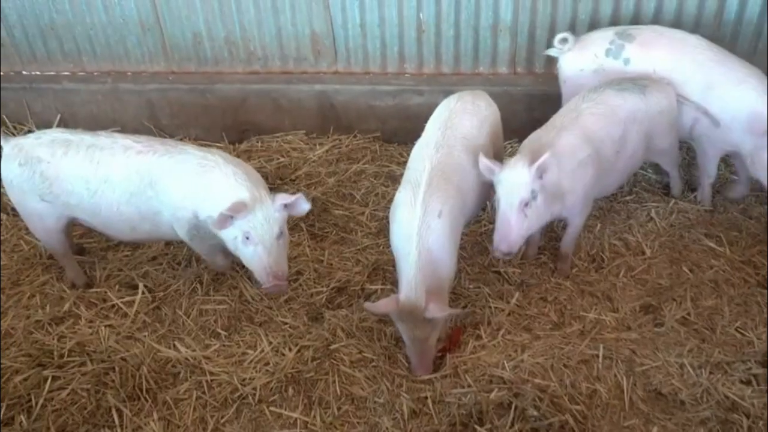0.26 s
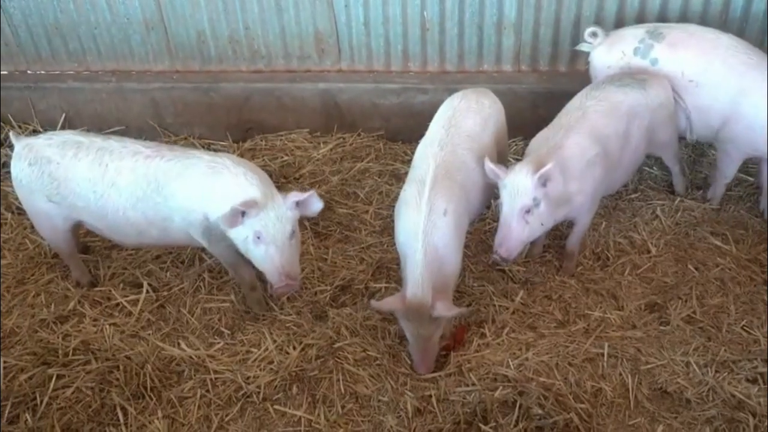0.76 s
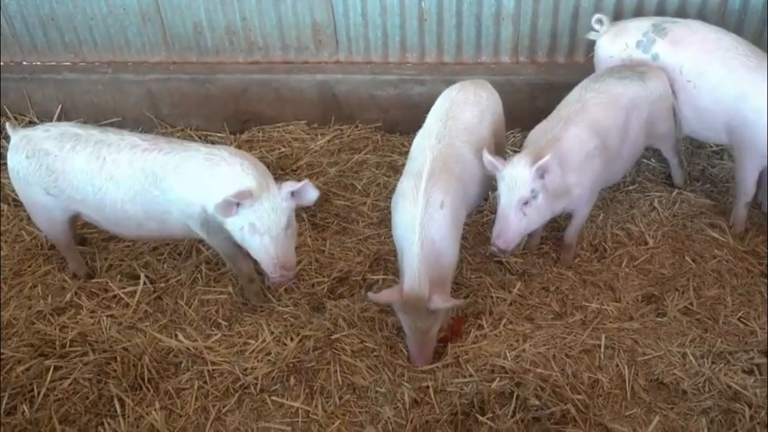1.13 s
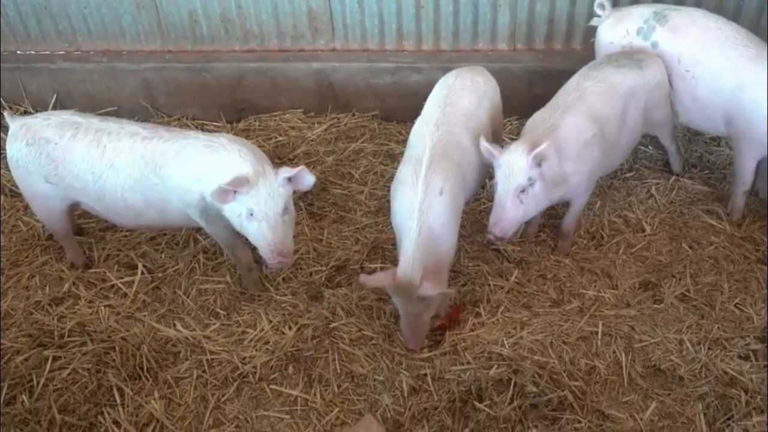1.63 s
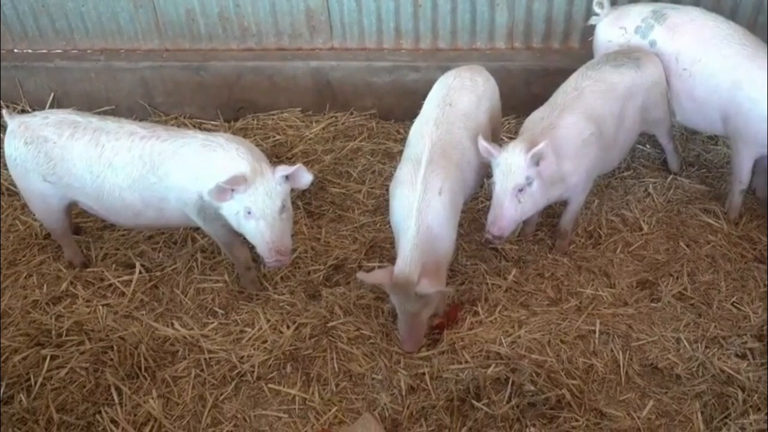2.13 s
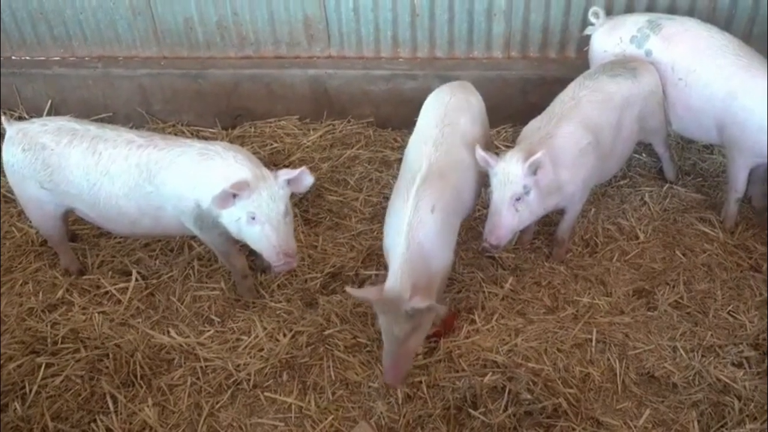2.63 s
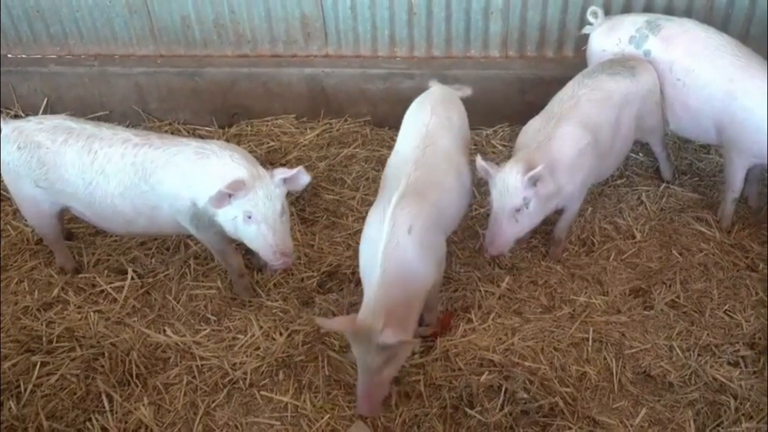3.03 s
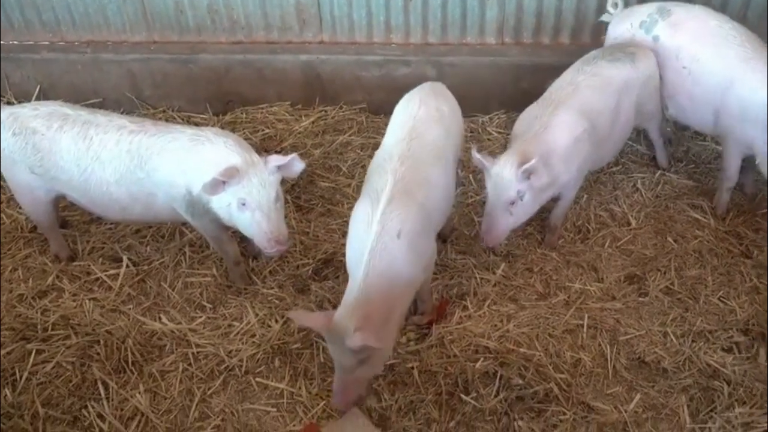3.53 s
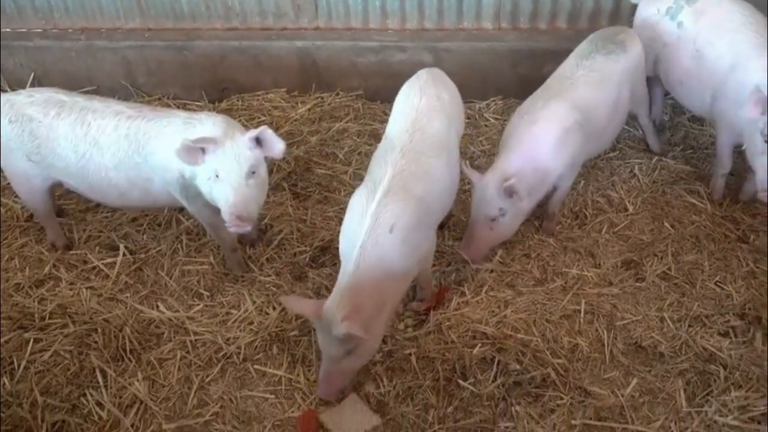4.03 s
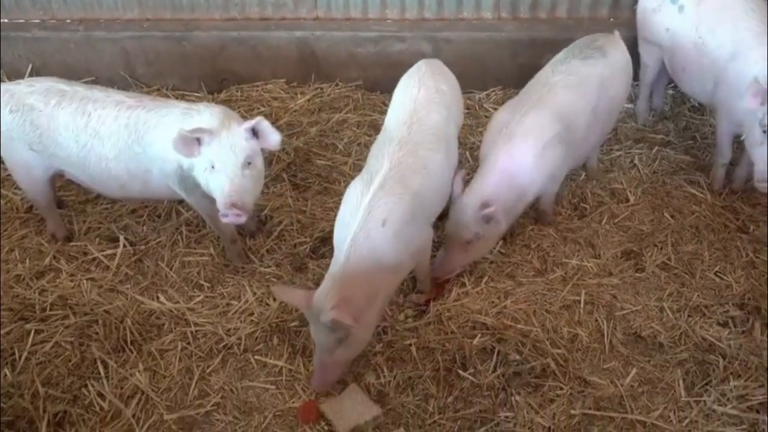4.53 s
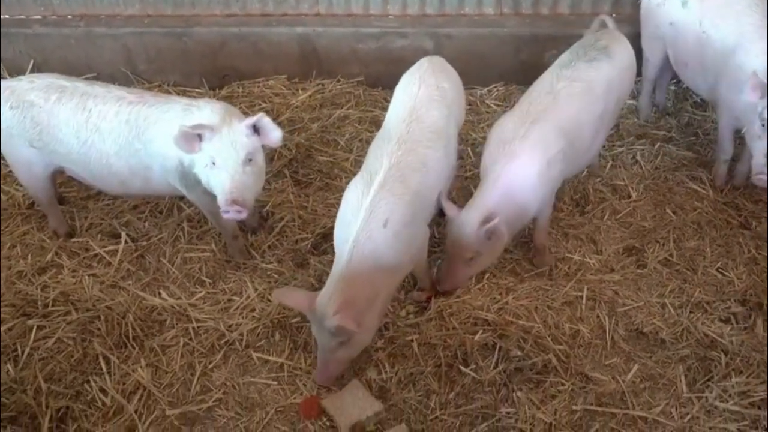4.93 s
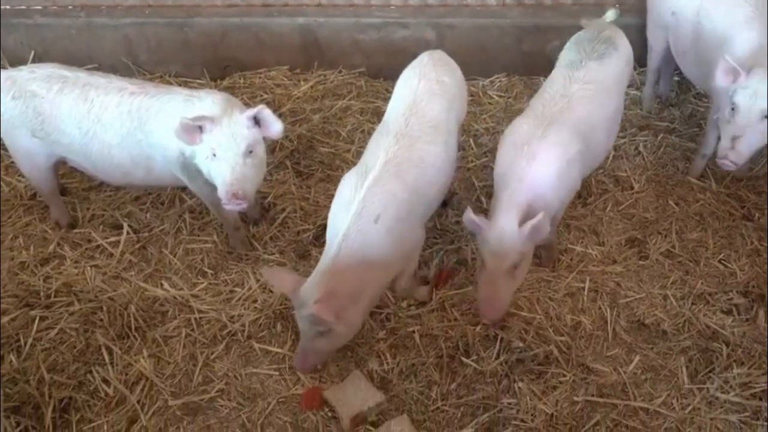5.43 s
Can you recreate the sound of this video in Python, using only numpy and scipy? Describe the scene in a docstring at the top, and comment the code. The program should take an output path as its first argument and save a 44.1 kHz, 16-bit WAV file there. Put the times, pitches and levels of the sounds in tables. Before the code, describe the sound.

About a third of a second of silence, then soft shed noise and faint straw crackles open abruptly. Young pigs close to a dull microphone give nine short, fluttering low grunts, separated by airy snuffles and wet smacks. The middle ones are weaker and breathier, with a hoarse nasal whistle and soft hum; the last are the loudest, slightly distorted. Short reflections come from walls and roof.

```python
"""In a low-walled straw pen, after a moment of silence, a dull microphone opens close to young pigs rooting.
Over the shed's soft noise and faint straw crackles come grunts: slow, uneven rattles of throat flaps, about
50 a second, ringing in chest, throat and long snout, with short reflections from the walls and roof.
Between grunts air rushes through the snouts and lips smack; later nostrils whistle hoarsely and a throat hums.
The loudest flaps overload the microphone slightly."""
import sys
import numpy as np
from scipy import signal
from scipy.fft import rfft, irfft
from scipy.io import wavfile
from scipy.ndimage import uniform_filter1d, minimum_filter1d

SR = 44100
rng = np.random.default_rng(int(sys.argv[2]) if len(sys.argv) > 2 else 0)


def persist_wave(psi):
    """Save psi, clipped to +-1, as 16-bit WAV."""
    counts = np.round(np.clip(psi, -1, 1) * 32767).astype(np.int16)
    wavfile.write(sys.argv[1], SR, np.atleast_2d(counts).T)


N = 250929
RASP_FROM_HZ = 1200  # resonances from here up carry the rasp of a grunt and the hiss of a snuffle
TISSUE_WIDTH_HZ = 60  # soft tissue damps every resonance to at least this width


def amp(db):
    """Decibels to gain."""
    return 10 ** (np.asarray(db) / 20)


def evened(x):
    """Scales to rms 1."""
    return x / np.sqrt(np.mean(x ** 2) + 1e-20)


def read(points, hz):
    """Reads a table on a log-frequency axis."""
    f, value = np.transpose(points)
    return np.interp(np.log(hz + 1), np.log(f + 1), value)


def add(mix, s, sound):
    """Mixes a sound in at time s."""
    part = mix[max(round(s * SR), 0):][:len(sound)]
    part += sound[:len(part)]


def lowpass(x, hz):
    """Steep low-pass."""
    taps = signal.firwin(301, hz, window=("kaiser", 8), fs=SR)
    return signal.oaconvolve(x, taps, "same")


def ring(x, modes, size=4096):
    """Passes x through a set of steep resonances, as a causal minimum-phase filter."""
    hz = abs(np.fft.fftfreq(size, 1 / SR))
    power = 0
    for f, width, db in modes:
        offset = 2.16 * (hz - f) / max(width, TISSUE_WIDTH_HZ)
        power = power + amp(db) ** 2 / (1 + offset ** 2) ** 2
    log_gain = np.log(power + 1e-10) / 2
    taps = np.fft.ifft(np.exp(np.conj(signal.hilbert(log_gain)))).real
    return signal.oaconvolve(x, taps)[:len(x)]


def resonate(x, hz, width):
    """A steep resonance that follows the curve hz: shift it to zero, smooth twice, shift back."""
    turn = np.exp(2j * np.pi * np.cumsum(hz * np.ones(len(x))) / SR)
    r = np.exp(-np.pi * width / SR)
    smooth = signal.lfilter([(1 - r) ** 2], [1, -2 * r, r * r], x / turn)
    return 2 * (turn * smooth).real


def puffs(clicks, decay_s, rise_s=0.00027):
    """A burst of turbulent air swells and fades after every click, about as strong whatever its decay."""
    fall, rise = np.exp(-1 / (decay_s * SR)), np.exp(-1 / (rise_s * SR))
    opening = signal.lfilter([np.sqrt(1 - fall ** 2)], [1, -fall], clicks)
    return signal.lfilter([1 - rise], [1, -rise], opening) * rng.standard_normal(len(clicks))


def swell(length, peak_share, depth_db):
    """Level in dB that climbs to 0 at a share of the length and falls back."""
    peak = np.clip(peak_share, .01, .99)
    return np.interp(np.linspace(0, 1, int(length * SR)), [0, peak, 1], [-depth_db, 0, -depth_db])


def arch(first, middle, last, u):
    """A smooth bend through three values as u runs from 0 to 1."""
    bend = middle - (first + last) / 2
    return first + (last - first) * u + bend * 4 * u * (1 - u)


# spectral shape of the shed's noise: (f/Hz, relative level per Hz/dB)
PEN_AIR = [(15, -36), (25, -9), (97, -6), (146, -17.5), (218, -9.5), (341, -15), (763, -12), (831, -25.5),
           (1240, -11), (1440, -19.5), (4000, -20.5), (5200, -51), (8800, -120)]
PEN_AIR_DB = -49


def background(straw_db=-60, crackles_per_s=45):
    """Soft noise of the shed, and faint crackles of trodden straw: short noise bursts at random moments."""
    air = irfft(rfft(rng.standard_normal(N)) * amp(read(PEN_AIR, np.fft.rfftfreq(N, 1 / SR))), N)
    sizes = amp(2.1 * np.minimum(rng.exponential(1, N), 4))
    snaps = (rng.random(N) < crackles_per_s / SR) * sizes
    straw = ring(puffs(snaps, decay_s=0.0035), [(1900, 1200, 0), (3500, 4800, 0)])
    return amp(PEN_AIR_DB) * evened(air) + amp(straw_db) * evened(straw)


# single flaps that crack out above the rattle: (t/s, extra level/dB)
HARD_FLAPS = [(.498, 0.5), (1.066, 0.5), (1.681, 7.5), (1.727, 6.5), (1.752, 5.5), (2.458, 9), (4.291, 4.5),
              (4.808, 4), (5.427, 1.5)]


def flaps(t, rate, end, jitter_s=.0004, uneven_db=1.9):
    """Times and extra dB of the moments when the throat tissue slaps shut, a little uneven in both."""
    turns = np.cumsum(rate) / SR
    due = np.interp(np.arange(np.interp(end, t, turns)), turns, t)
    late, size = rng.standard_normal((2, 40))[:, :len(due)]
    hard_db = sum(db * (abs(due - s) < .009) for s, db in HARD_FLAPS)
    return zip(due + jitter_s * late, uneven_db * size + hard_db)


def wobbled(modes, detune=0.01, uneven_db=2.5):
    """Tongue and snout never hold still: each flap meets slightly different resonances."""
    shifts = rng.standard_normal((len(modes), 2))
    return [(f * (1 + detune * a), width, db + uneven_db * b)
            for (f, width, db), (a, b) in zip(modes, shifts)]


def spread(clicks, hz=900, pole=0.959):
    """An all-pass smears each slap over a millisecond or two, as early reflections off the floor would, so it
    builds up gently."""
    poles = [1, -2 * pole * np.cos(2 * np.pi * hz / SR), pole * pole]
    return signal.lfilter(poles[::-1], poles, clicks)


ONSET_DB, ENDING_DB = -15, -15  # effort at the first and last moment of a grunt, re its hold


def slackening(t, length, attack_s, release_s):
    """Attack, hold and release of a grunt's effort, in dB re the hold."""
    rising = 1 - t / attack_s if t < attack_s else 0
    falling = max(1 - (length - t) / release_s, 0)
    return ONSET_DB * rising + ENDING_DB * falling


SNOUT_SAG = 0.094  # share by which the snout resonance dips in mid-grunt
RASP_KEEPS = .25  # share of lost effort that the rasp does not follow: weak flaps are raspier
# resonances held during each grunt, from throat and nose and from a close reflection off floor or wall; # each
# flap wobbles around them: (f/Hz, width/Hz, relative level/dB)
THROAT_1 = [(147, 204, -10), (379, 81, -6.5), (565, 106, -4.5), (686, 43, -7.5), (784, 95, -1),
            (1770, 280, -26), (2280, 340, -20), (2900, 370, -23.5), (3400, 50, -34), (3510, 270, -21)]
THROAT_2 = [(174, 104, -10.5), (378, 94, -10), (594, 340, -15), (796, 104, -7), (1810, 410, -29),
            (2210, 110, -21.5), (2534, 270, -18), (2940, 440, -24), (3560, 740, -28.5)]
THROAT_3 = [(169.4, 110, 1), (393, 100, 0.5), (578, 140, -2.5), (803, 106, 4), (1827, 180, -21.5),
            (2210, 140, -16), (2486, 155, -13.5), (2880, 220, -22.5), (3450, 960, -25.5)]
THROAT_4 = [(162, 130, -5.5), (392, 340, -12.5), (547, 97, -4), (767, 106, -2), (1845, 170, -20),
            (2140, 150, -22), (2430, 320, -16.5), (2805, 190, -15), (3610, 540, -21.5)]
THROAT_4_END = [(176, 90, -6.5), (386, 140, -11.5), (562, 160, -7.5), (753, 115, -7.5), (830, 54, -4.5),
                (1664, 650, -17), (2250, 170, -35), (2560, 590, -25.5), (2920, 50, -22.5),
                (3380, 1100, -31)]
THROAT_5 = [(149, 58, -1), (214, 43, -5), (351, 280, -4), (616, 200, 1), (785, 29, 1.5), (1710, 16, -23),
            (2030, 449, -23.5), (2560, 182, -23.5), (2820, 160, -23), (3480, 540, -29)]
THROAT_6 = [(162, 135, -6), (305, 37, -2), (393, 99, -4), (554, 162, -15), (766, 39, -4), (1694, 250, 6),
            (2040, 43, -8), (2130, 150, -2), (2550, 250, -7), (3160, 760, -9.5)]
THROAT_7 = [(183, 104, -5), (530, 36, -17.5), (746, 720, -6.5), (806, 20, -17), (876, 34, 1.5),
            (1700, 570, -20.5), (2630, 150, -26), (2770, 61, -25.5), (3150, 89, -27), (3490, 290, -24)]
THROAT_8 = [(214, 180, -10.5), (360, 55, -6), (659, 194, -1.5), (780, 53, -1), (1514, 1100, -29),
            (2590, 1250, -20), (2890, 71, -20.5), (3000, 300, -23.5), (3570, 300, -22)]
THROAT_8_END = [(229, 90, -1.5), (625, 610, -6.5), (720, 104, 4.5), (870, 180, 1), (1607, 95, -7.5),
                (1855, 170, -10), (2162, 95, -6.5), (2860, 96, -30), (3110, 1100, -23.5)]
THROAT_9 = [(183, 45, -2), (405, 670, -8), (635, 146, -2), (760, 160, 3), (813, 65, 4.5),
            (1550, 1600, -21.5), (2097, 50, -12), (2294, 190, -15), (3190, 1100, -28), (3580, 570, -24.5)]
# One row a grunt, two where the mouth changes shape midway.
# Snout and rasp each peak at some share of the length and fall away on both sides.
# (t/s, length/s, first, middle and last flap rate f/Hz, effort level/dB, attack/s, release/s,
#  snout start f/Hz, snout end f/Hz, snout width/Hz, snout level/dB, snout peak share 0-1, snout fall/dB per s,
#  rasp level/dB, rasp peak share 0-1, rasp fall/dB per s, airiness as gain, chest level/dB, throat table)
GRUNTS = [ (0.372, .2, 61.3, 62.85, 37.3, -20.5, 0.033, 0.026, 1055, 1280, 192, -4.5, 0.99, 37, -10.5, 0.52, 75, 0.74, -19, THROAT_1),
          (0.919, .192, 32.73, 52.98, 49.5, -20, 0.059, 0.035, 1320, 1295, 98, 3, 0.74, 88, -9, 0.61, 35.5, 0.67, -10.5, THROAT_2),
          (1.51, 0.31, 38.2, 48.65, 14.9, -18.5, 0.026, 0.24, 1065, 1557, 150, 0, 0.63, 59, -8, 0.49, 38.5, 0.51, -11, THROAT_3),
          (2.254, 0.15, 43.7, 61.9, 37.8, -22.5, 0.025, .005, 1285, 1282, 60, -1, 0.32, 30, -7.5, 0.52, 33, 0.76, -15, THROAT_4),
          (2.4, 0.27, 54.77, 41.23, 40.3, -15.5, 0, 0.35, 1310, 1530, 122, -8.5, 0.05, 96, -13, 0.67, 27, 0.72, -17.5, THROAT_4_END),
          (3.041, .245, 32.88, 43.05, 30, -27, 0.046, 0.093, 1060, 1024, 130, -4.5, 0.63, 94, -15, 0.64, 42, 1.9, -13.5, THROAT_5),
          (3.498, 0.26, 38.54, 42.74, 36.7, -33, 0.00058, 0.028, 1075, 1160, 136, -3, 0.07, 38, -4, 0.52, 28, 3.1, -9, THROAT_6),
          (4.191, .15, 63.8, 46.75, 69.9, -21.5, 0.034, .005, 1038, 1193, 101, 4.5, 0.58, 129, -6.5, 0.78, 100.5, 0.85, -20.5, THROAT_7),
          (4.594, 0.14, 36.27, 68.73, 42, -15.5, 0.047, .005, 1065, 1027, 158, 2, 0.59, 129, -14, 0, 23.5, .9, -28, THROAT_8),
          (4.744, 0.11, 45, 48.3, 22, -14, 0, 0.053, 1046, 1130, 94, -5, 0, 70, -6, 0.1, 70, 0.6, -25.5, THROAT_8_END),
          (5.279, .2, 68.16, 48.86, 32.5, -11, 0.053, 0.11, 973, 1030, 85, -6.5, 0.26, 91, -9, 1, 39.5, .8, -20, THROAT_9),
          ]


def grunt(row, rasp_slap=0.26, rasp_air=1.0, rasp_decay_s=0.0049, air_decay_s=0.014, size=4096):
    """Every flap and its puff ring the chest, low throat, gliding snout and rasping upper resonances."""
    start, length, *rates, hold_db, attack_s, release_s = row[:8]
    first_hz, last_hz, snout_width, snout_top_db, snout_peak, snout_fall = row[8:14]
    rasp_top_db, rasp_peak, rasp_fall, airiness, chest_db, throat = row[14:]
    t = np.arange(0, length, 1 / SR)
    low_modes = [m for m in throat if m[0] < RASP_FROM_HZ]
    high_modes = [m for m in throat if m[0] >= RASP_FROM_HZ]
    mid_hz = (1 - SNOUT_SAG) * (first_hz + last_hz) / 2
    leak_s = air_decay_s * np.sqrt(1 + airiness)  # a slack, airy throat leaks for longer
    click = signal.unit_impulse(size)
    slap = spread(click)
    out = np.zeros(len(t) + size)
    for s, extra_db in flaps(start + t, arch(*rates, t / length), start + length):
        u = np.clip((s - start) / length, 0, 1)
        rate = arch(*rates, u)
        slack_db = slackening(u * length, length, attack_s, release_s)
        snout_hz = arch(first_hz, mid_hz, last_hz, u)
        snout_db = snout_top_db - snout_fall * length * abs(u - snout_peak)
        rasp_db = rasp_top_db - rasp_fall * length * abs(u - rasp_peak) - RASP_KEEPS * slack_db
        air = airiness * puffs(click, leak_s)
        splutter = rasp_slap * slap + puffs(click, rasp_decay_s) + rasp_air * air  # wet tissue closes raggedly
        low_throat = evened(ring(slap + air, wobbled(low_modes, detune=0.014, uneven_db=1.0)))
        chest = evened(ring(slap + air, [(80.5, TISSUE_WIDTH_HZ, 0)]))
        snout = evened(ring(slap + air, [(snout_hz, snout_width, 0)]))
        rasp = evened(ring(splutter, wobbled(high_modes)))
        flap = low_throat + amp(chest_db) * chest + amp(snout_db) * snout + amp(rasp_db) * rasp
        # effort is the level averaged over one cycle
        per_cycle = np.sqrt(SR / rate / size)
        add(out, s - start, amp(hold_db + slack_db + extra_db) * per_cycle * flap)
    return start, out


# how long the pen's reflections take to die by 60 dB: (f/Hz, t60/s)
PEN_T60 = [(100, 0.39), (500, 0.4), (1200, 0.14), (4000, 0.37)]


def pen(x, first_s=0.0047):
    """Reflections from the walls and roof: sparse taps, each band dying at its own speed."""
    sparse = (rng.random(SR) < 2500 / SR) * (np.arange(SR) > first_s * SR)
    taps = rng.choice([-1., 1.], SR) * sparse
    hz, t, z = signal.stft(taps, SR, nperseg=256)
    decay = amp(-60 * t / read(PEN_T60, hz)[:, None])
    tail = signal.istft(z * decay, SR, nperseg=256)[1]
    return signal.fftconvolve(x, tail / np.linalg.norm(tail))[:N]


# resonances of the nasal passages: (f/Hz, width/Hz, relative level/dB)
NOSE = [(150, 620, -4), (366, 90, -2.5), (608, 240, -2), (750, 240, -9), (1000, 190, -2.5),
        (1654, 480, -14), (2030, 810, -17.5), (2970, 1500, -24.5), (3150, 1100, -24.5), (4300, 550, -19)]
# air blown through a rooting snout:
# (t/s, length/s, flow level at the start/dB, swell/dB per s, hiss level re flow/dB)
SNUFFLES = [(0.581, 0.19, -41, -115, 0), (1.126, 0.21, -42, -70, 2.5), (1.799, 0.24, -33.5, -56, -7),
            (2.688, .35, -43, -8.5, 0.5), (3.433, 0.25, -43.5, 68, -6.5), (3.741, 0.5, -37.5, -8.5, -2),
            (4.877, .31, -42, -10, -5), (5.189, 0.088, -47, 141, -1.5), (5.464, .215, -33.5, -55, -4)]


def snuffle(start, length, flow_db, swell_db_per_s, hiss_db, flutter_db=1.5, flutter_per_s=110):
    """Fluttering air flow through the nasal passages, steadily swelling or dying away."""
    t = np.arange(0, length, 1 / SR)
    flutter = evened(uniform_filter1d(rng.standard_normal(len(t)), int(SR / flutter_per_s)))
    air = rng.standard_normal(len(t)) * amp(flutter_db * flutter)
    body = evened(ring(air, [m for m in NOSE if m[0] < RASP_FROM_HZ]))
    hiss = evened(ring(air, [m for m in NOSE if m[0] >= RASP_FROM_HZ]))
    level = amp(flow_db + swell_db_per_s * t) * signal.windows.tukey(len(t), .12)
    return start, level * (body + amp(hiss_db) * hiss)


# lip smacks and snout pops: (t/s, click peak level/dB, hollow pop level re click/dB, ring f/Hz, decay/s)
SMACKS = [(0.817, -37, -14, 2170, 0.0032), (0.921, -29, -26, 1620, 0.0028), (1.468, -27.5, 2, 1870, 0.0065),
          (2.196, -29, -6, 1750, 0.0057), (2.212, -18.5, -1.5, 3300, 0.0026),
          (3.869, -30.5, 4, 3180, 0.004), (4.125, -30, -27.5, 3680, 0.0022),
          (4.547, -29.5, -1.5, 1940, 0.0031), (4.563, -22.5, -8, 1980, .004)]


def smack(s, peak_db, pop_db, hz, decay_s):
    """A wet click at the lips with a hollow pop from the mouth behind it."""
    t = np.arange(SR // 16) / SR
    burst = rng.standard_normal(len(t)) * np.exp(-t / decay_s)
    click = ring(burst, [(hz, 800, 0)])
    pop = ring(burst, [(340, 370, -0.5), (710, 110, -5.5)])
    return s, amp(peak_db) * (click / abs(click).max() + amp(pop_db) * pop / abs(pop).max())


WHISTLE_SWELL_DB = 21.5  # rise from the ends of a whistle to its peak
# narrowed nostrils whistle hoarsely:
# (t/s, length/s, peak level/dB, peak share 0-1, start f/Hz, end f/Hz)
WHISTLES = [(1.812, 0.037, -23.5, 0.34, 774, 470), (2.69, 0.43, -31, 0.46, 1075, 995),
            (3.784, 0.93, -35.5, 0, 1005, 1000)]


def whistle(start, length, peak_db, peak_share, first_hz, last_hz, width_hz=110, nasal_hz=585, nasal_db=-5):
    """Air sings in a narrow, sinking nostril resonance and in the longer passage behind it."""
    db = peak_db + swell(length, peak_share, WHISTLE_SWELL_DB)
    air = rng.standard_normal(len(db))
    nostril = evened(resonate(air, np.linspace(first_hz, last_hz, len(db)), width_hz))
    passage = evened(resonate(air, nasal_hz, width_hz / 2))
    return start, amp(db) * (nostril + amp(nasal_db) * passage) * signal.windows.tukey(len(db), .15)


HUM_SWELL_DB = 11.5  # rise from the ends of a hum to its peak
# a soft, closed-mouth hum under one long puff:
# (t/s, length/s, peak level/dB, peak share 0-1, start f/Hz, end f/Hz)
HUMS = [(2.738, .2, -38, .55, 138.3, 118.4)]


def hum(start, length, peak_db, peak_share, first_hz, last_hz, overtone_db=-11):
    """The throat vibrates gently and evenly: a low, sinking tone with two weak overtones."""
    db = peak_db + swell(length, peak_share, HUM_SWELL_DB)
    phase = 2 * np.pi * np.cumsum(np.linspace(first_hz, last_hz, len(db))) / SR
    tone = np.sin(phase) + amp(overtone_db) * (np.sin(2 * phase) + np.sin(3 * phase))
    return start, amp(db) * evened(tone) * signal.windows.tukey(len(db), .2)


def scene():
    """All the pigs' sounds, the pen's echo and the background."""
    pigs = np.zeros(N)
    for row in GRUNTS:
        add(pigs, *grunt(row))
    for play, table in [(snuffle, SNUFFLES), (smack, SMACKS), (whistle, WHISTLES), (hum, HUMS)]:
        for row in table:
            add(pigs, *play(*row))
    return (pigs + amp(-11.0) * pen(pigs) + background())[None]


START_S = .369  # the microphone is silent until here
MIC_EDGE_HZ, EDGE_HZ = 4000, 9400  # top of the microphone's range, and of its output after distortion


def record(dry, ceiling=1.1, overload=0.68, knee=14, hold_s=0.0018):
    """A dull microphone opens after silence; a fast limiter holds the loudest flaps, which distort slightly."""
    x = signal.sosfilt(signal.butter(3, 57, "highpass", fs=SR, output="sos"), dry[0])
    opening = np.clip((np.arange(N) / SR - START_S) / 0.0043, 0, 1)
    x = lowpass(x, MIC_EDGE_HZ) * opening
    hold = max(int(hold_s * SR), 1)
    limit = ceiling / np.maximum(abs(x), ceiling)
    x = x * uniform_filter1d(minimum_filter1d(limit, hold), hold)
    x = x / (1 + abs(x / overload) ** knee) ** (1 / knee)  # soft clipping
    return lowpass(x, EDGE_HZ)[None]


dry = scene()
out = record(dry)
persist_wave(out)
```